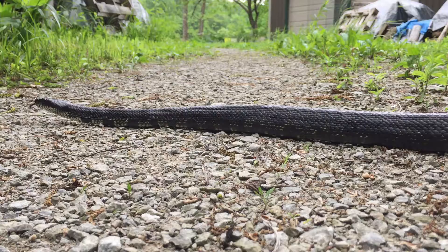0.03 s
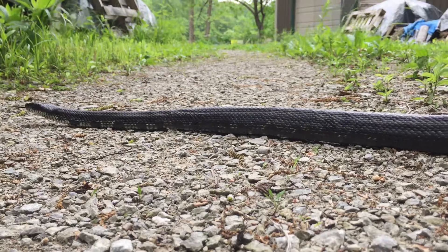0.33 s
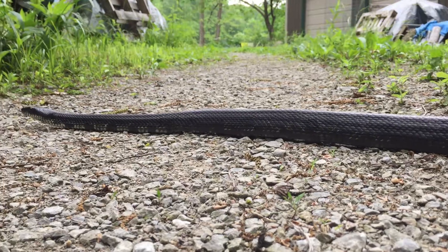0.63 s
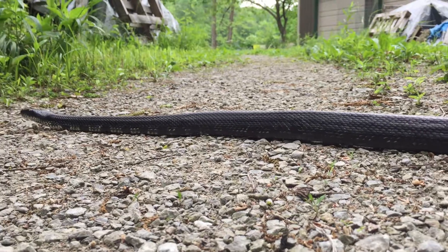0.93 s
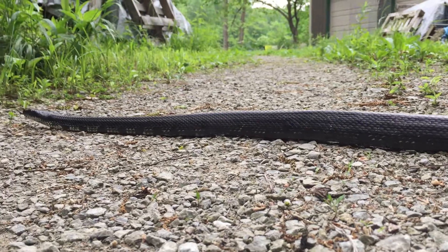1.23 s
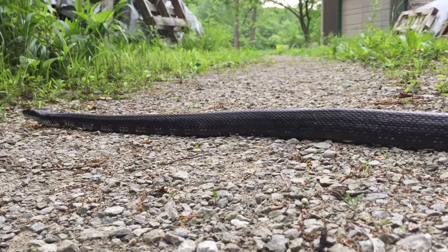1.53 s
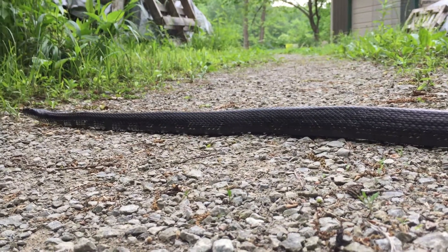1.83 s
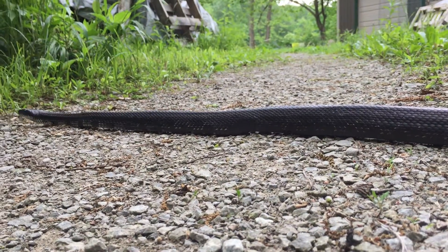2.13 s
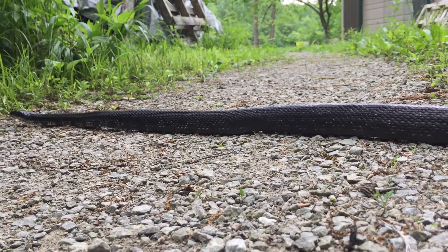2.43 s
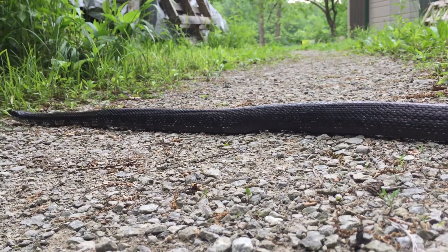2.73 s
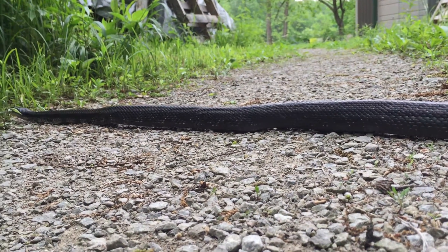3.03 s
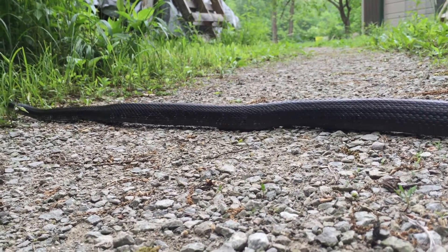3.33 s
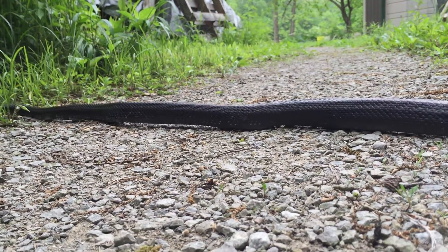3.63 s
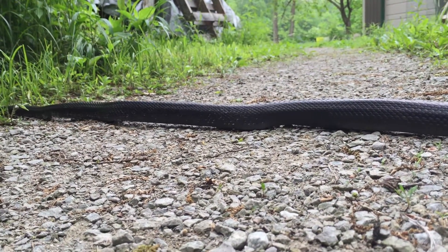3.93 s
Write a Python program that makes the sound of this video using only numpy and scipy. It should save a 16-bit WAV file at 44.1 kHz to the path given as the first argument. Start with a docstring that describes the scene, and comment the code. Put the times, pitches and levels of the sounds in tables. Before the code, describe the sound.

A low rumble of wind or distant traffic runs quietly under a faint leafy hiss, stepping up at about 2.2 seconds. Soft buffets thump the microphone throughout, and a finger bumps it dully at 0.8 seconds. Small birds chirp, whistle and warble faintly in the trees, busiest from 1 to 2.5 seconds. Gravel ticks lightly close by near 0.4, 1.4 and 3.2 seconds.

```python
"""A low, far rumble of wind or traffic, stepping up halfway, heard from a gravel path at a wood's edge.
The microphone is hand-held near the ground: soft buffets thump on it and a finger bumps its case once.
Close by, a stone ticks now and then over a faint hiss of leaves and gravel.
Small birds chirp and whistle in the trees, near and far; the trunks scatter their notes into a haze."""
import sys
import numpy as np
from scipy import signal
from scipy.fft import rfft, irfft
from scipy.io import wavfile
from scipy.ndimage import uniform_filter1d

SR = 44100
rng = np.random.default_rng(int(sys.argv[2]) if len(sys.argv) > 2 else 0)


def inscribe(sig):
    """Save sig as 16-bit PCM at rate SR to the path in sys.argv[1].

    A 1-D sig is mono; a 2-D sig holds one channel per row.
    Samples are clipped to [-1, 1] before scaling.
    """
    pcm = np.round(np.clip(np.atleast_2d(sig).T, -1, 1) * 32767)
    wavfile.write(sys.argv[1], SR, pcm.astype(np.int16))


N = 176400
T = np.arange(N) / SR

# still air around the path: f/Hz, relative density/dB
AIR_SPECTRUM = [(25, -24), (40, 0.5), (80, -3), (105, -4.5), (140, 2), (200, -4), (260, -0.5), (350, -9),
                (460, -14.5), (600, -13), (950, -14), (1300, -22.5), (1800, -20.5), (2400, -25.5)]
# hiss of leaves and gravel: f/Hz, relative density/dB
HISS_SPECTRUM = [(1700, 0), (2500, -2), (3400, -2), (4200, -5.5), (4900, -8), (5800, -7), (7800, -14),
                 (9600, -15), (10400, -21), (11500, -18), (15000, -22)]
# the hiss easing off: t/s, level/dB
HISS_LEVEL = [(.12, -64), (.45, -64), (.66, -64), (1.2, -64), (2.2, -65.5), (3.0, -66.5), (4.0, -67)]
# wind or traffic far off: f/Hz, relative density/dB
RUMBLE_SPECTRUM = [(25, -16.5), (60, 5), (130, 1), (200, -1.5), (280, -1.5), (400, -5.5), (620, -6.5),
                   (780, -13), (1000, -12.5), (1250, -13), (1520, -11), (1750, -22.5), (2900, -26.5),
                   (4500, -46)]
# the rumble stepping up: t/s, level/dB
RUMBLE_LEVEL = [(.12, -56), (2.17, -56), (2.21, -47), (2.5, -47), (2.9, -47.5), (3.3, -47), (3.7, -48.5),
                (4.0, -47.5)]
# tones droning in the rumble: f/Hz, resonator width/Hz, level against the rumble/dB
DRONES = [(138, 8.5, -13), (240.5, 5, -14.5), (397, 13, -24), (1399, 49, -26), (1915, 41, -26.5)]
# the farthest birds swelling and fading: t/s, level/dB
CHORUS_LEVEL = [(.12, -69), (.42, -75), (.6, -73), (.9, -63.5), (1.12, -72), (1.22, -65.5), (1.62, -65.5),
                (1.95, -63.5), (2.25, -66.5), (2.55, -74), (2.68, -75), (2.85, -80), (4.0, -78)]
# buffets on the microphone: centre t/s, half-width/s, thump level/dB, puff level/dB
BUFFETS = [(0.122, 0.0084, -39.5, -52), (0.18, 0.048, -41, -50), (0.265, 0.017, -38, -43.5),
           (0.298, 0.024, -36, -42.5), (0.851, 0.023, -44, -60), (0.888, 0.0096, -44.5, -49),
           (1.019, 0.017, -38.5, -58), (1.047, 0.041, -38.5, -51), (1.593, 0.0089, -40, -49.5),
           (1.783, 0.035, -46, -50), (1.814, 0.0099, -36, -48.5), (1.863, 0.026, -43.5, -59),
           (1.975, 0.03, -48.5, -73), (2.224, 0.016, -46, -40.5), (2.258, 0.021, -41, -50),
           (2.782, 0.02, -47, -47), (2.959, 0.047, -42, -57), (3.437, 0.031, -48, -59),
           (3.497, 0.018, -34.5, -63), (3.555, 0.043, -42.5, -71), (3.626, 0.013, -37.5, -50),
           (3.672, 0.088, -42.5, -53), (3.973, 0.018, -54, -70)]
# chirps in the near trees: t/s, length/s, first f/Hz, middle f/Hz, last f/Hz, relative level/dB, rasp/Hz
CHIRPS = [(.21, 0.022, 5700, 5500, 5600, -65, 87.5), (.215, .02, 6960, 7040, 7000, -71, 69),
          (.258, 0.032, 7130, 7000, 6930, -74, 70), (0.348, 0.032, 4790, 5160, 5600, -66, 200),
          (0.48, 0.047, 7200, 7050, 6960, -78, 50), (0.532, 0.067, 6950, 6850, 6700, -70, 30),
          (0.604, 0.095, 6770, 6690, 6620, -67, 25), (0.563, 0.14, 5850, 4880, 4240, -68.5, 55),
          (0.833, 0.022, 6550, 7160, 7600, -66, 40), (.865, 0.016, 5450, 5300, 5250, -69, 60),
          (0.95, 0.013, 5500, 5300, 5200, -63.5, 60), (1.083, 0.027, 6950, 6750, 6720, -68, 40),
          (1.159, 0.017, 7000, 7350, 7540, -70.5, 60), (1.183, .028, 5980, 5340, 5200, -64.5, 220),
          (1.255, 0.03, 6100, 5420, 5200, -64, 130), (1.335, 0.052, 5800, 5230, 5220, -68, 70),
          (1.995, 0.084, 6050, 6100, 5900, -69, 130), (2.06, 0.042, 5460, 5200, 5150, -67, 230),
          (2.238, .018, 6100, 6040, 5950, -76, 60), (2.313, .025, 5800, 5580, 5600, -74, 120),
          (2.511, 0.014, 5550, 5580, 5620, -67.5, 30), (3.162, 0.019, 7450, 7280, 7200, -63.5, 30),
          (3.944, 0.026, 6860, 6250, 6000, -68.5, 70), (3.973, .025, 7000, 6900, 6460, -71, 90)]
# swooping calls in the near trees: t/s, length/s, outer f/Hz, turning f/Hz, relative level/dB
SWOOPS = [(1.564, 0.08, 7140, 5140, -61), (1.784, 0.056, 6830, 5260, -64), (3.763, 0.049, 7530, 8300, -71),
          (3.776, 0.059, 7570, 6840, -73.5), (3.815, 0.047, 7300, 8000, -74)]
# stones ticking on the path: t/s, relative level/dB
TICKS = [(0.444, -45), (1.405, -52), (3.163, -50)]
# ring of the stones: f/Hz, relative level/dB, t60/s
STONE_MODES = [(790, -5, 0.031), (1500, -2.5, 0.048), (3750, -9, 0.054)]
# a finger on the microphone's case: t/s, relative level/dB
KNOCKS = [(.7718, -24.5)]
# ring of the case: f/Hz, relative level/dB, t60/s
CASE_MODES = [(76.5, -10.5, 0.13), (160, -3, 0.0275), (338, -5.5, 0.02)]
# steady whistles, mostly from a bird further off; the 2.15 s row and the last two are the warbler's notes, held
# steady: t/s, length/s, f/Hz, relative level/dB
WHISTLES = [(.79, 0.16, 3730, -61.5), (0.949, 0.093, 3760, -61), (1.182, 0.052, 3610, -68),
            (1.292, .13, 5190, -72), (1.391, 0.035, 3400, -64), (2.073, 0.053, 3660, -62),
            (2.15, 0.14, 4430, -67), (2.179, 0.13, 3450, -62), (2.29, 0.14, 3490, -64),
            (2.408, 0.11, 3435, -65.5), (3.14, 0.037, 2380, -63), (3.83, .04, 1950, -60)]
# a warbling bird deeper in the wood: t/s, length/s, first f/Hz, last f/Hz, relative level/dB
WARBLE = [(1.191, .04, 3900, 3260, -61), (1.205, .025, 4870, 4650, -72), (1.28, .035, 4790, 4370, -61),
          (1.3, 0.0336, 4150, 3550, -58), (1.347, 0.025, 4400, 4720, -65), (1.378, 0.038, 3950, 3400, -69),
          (1.455, 0.049, 3950, 3360, -61), (1.512, 0.037, 4280, 3860, -61), (1.575, 0.034, 4680, 4000, -61),
          (1.629, 0.056, 3950, 3480, -58), (1.702, 0.06, 4300, 3950, -61.5),
          (1.759, 0.051, 3920, 3570, -60.5), (1.812, .035, 4000, 3880, -64), (1.86, .035, 4150, 4510, -65),
          (1.91, .045, 3583, 3765, -56.5), (1.938, 0.048, 4350, 4040, -67), (2.417, .035, 4200, 4520, -71),
          (2.635, 0.04, 4050, 4360, -73), (2.677, 0.041, 3700, 3200, -68)]


def from_db(db):
    """Decibels to gain."""
    return 10 ** (np.asarray(db) / 20)


def unit_rms(x):
    """Scale to rms 1."""
    return x / np.sqrt(np.mean(x ** 2) + 1e-20)


def level(rows):
    """Gain over time from rows of t/s, level/dB."""
    return from_db(np.interp(T, *np.transpose(rows)))


def drift(rate_hz):
    """Smooth random wander with a spread of about 1."""
    step, settle = 40, 2000
    pole = np.exp(-2 * np.pi * rate_hz * step / SR)
    white = rng.standard_normal(N // step + settle + 2)
    slow = signal.lfilter([1], [1, -2 * pole, pole * pole], white)[settle:]
    return np.interp(np.arange(N) / step, np.arange(len(slow)), unit_rms(slow))


def add(out, start_s, sound):
    """Mix a sound in at a time."""
    i = int(np.clip(start_s * SR, 0, N - 1))
    out[i:i + len(sound)] += sound[:N - i]


def progress(length_s):
    """0 to 1 over a note."""
    return np.linspace(0, 1, max(int(length_s * SR), 2))


def noise(spectrum, flicker_db, flicker_hz):
    """Coloured noise, rms 1, falling steeply past the spectrum's ends; each octave flickers by itself."""
    hz, db = np.transpose(spectrum)
    octave = np.log2(np.maximum(np.fft.rfftfreq(N, 1 / SR), 1))
    beyond = np.maximum(octave - np.log2(hz[-1]), 0) + np.maximum(np.log2(hz[0]) - octave, 0)
    colour = from_db(np.interp(octave, np.log2(hz), db) - 36 * beyond)
    bins = rfft(rng.standard_normal(N)) * colour
    bands = [irfft(bins * np.maximum(1 - abs(octave - k), 0), N) for k in range(4, 16)]
    return unit_rms(sum(band * from_db(flicker_db * drift(flicker_hz)) for band in bands))


def air_and_leaves():
    """Still air all round the microphone, with a faint hiss of leaves and gravel."""
    air = from_db(-51.5) * noise(AIR_SPECTRUM, flicker_db=2.55, flicker_hz=13.4)
    hiss = level(HISS_LEVEL) * noise(HISS_SPECTRUM, flicker_db=1.2, flicker_hz=25)
    return air + hiss


def far_rumble():
    """Wind or traffic a long way off: low noise with narrow bands droning in it."""
    roar = noise(RUMBLE_SPECTRUM, flicker_db=.5, flicker_hz=11)
    white, drones = rng.standard_normal(N), 0
    for hz, width, db in DRONES:
        peak = signal.iirpeak(hz, hz / width, fs=SR)
        drones += from_db(db) * unit_rms(signal.lfilter(*peak, signal.lfilter(*peak, white)))
    return level(RUMBLE_LEVEL) * (roar + drones)


def sing(notes, waver_hz=107.4, flutter_db=3, fade_share=.28):
    """Near-sine notes from t/s, pitch track/Hz, level/dB, rasp/Hz; rasp is the depth of a fast waver."""
    out, waver = np.zeros(N), drift(waver_hz)
    flutter = from_db(flutter_db * drift(waver_hz))
    for start, hz, db, rasp_hz in notes:
        u = np.linspace(0, 1, len(hz))
        fade = np.sin(np.pi / 2 * np.clip(np.minimum(u, 1 - u) / fade_share, 0, 1))
        pitch = hz + rasp_hz * waver.take(int(start * SR) + np.arange(len(hz)), mode="wrap")
        tone = np.sqrt(2) * np.sin(2 * np.pi * np.cumsum(pitch) / SR)
        add(out, start, from_db(db) * fade * tone)
    return out * flutter


def random_notes(low_hz, high_hz, length_s, glide, db_per_octave, count):
    """Short slurred notes at chance times and pitches, the higher ones fainter."""
    slur, notes = glide * (2 * progress(length_s) - 1), []
    for k, (late, high, slope) in enumerate(rng.random((count, 3))):
        start = (k + late) * T[-1] / count
        hz = low_hz + high * (high_hz - low_hz)
        pitch = hz * (1 + slur * (2 * slope - 1))
        rasp_hz = 44.5 * hz / 4505  # about 1% of the pitch
        notes.append((start, pitch, db_per_octave * np.log2(hz / low_hz), rasp_hz))
    return sing(notes)


def flecks():
    """Faint, brief tones speckle the midrange of the background."""
    tones = random_notes(698.4, 2086, length_s=.05, glide=.014, db_per_octave=-5.5, count=260)
    return from_db(-63.5) * unit_rms(tones)


def wood(x, t60_s=.61):
    """Dense echoes from trunks and leaves, reaching the microphone from 3 ms on and dying away."""
    echoes = rng.standard_normal(SR) * from_db(-60 * T[:SR] / t60_s) * (T[:SR] > .003)
    return signal.fftconvolve(x, echoes / np.linalg.norm(echoes))[:N]


def far_chorus():
    """Many far birds twitter at random; only their echoes reach the path."""
    song = random_notes(3117, 4505, length_s=.0489, glide=.0824, db_per_octave=-14, count=400)
    return level(CHORUS_LEVEL) * unit_rms(wood(song))


def eddies(low_hz, high_hz, evenness=.88):
    """Lumpy swings of pressure in a band, their strength mostly levelled; rms 1."""
    band = signal.butter(2, [low_hz, high_hz], "band", fs=SR, output="sos")
    swings = signal.hilbert(signal.sosfilt(band, rng.standard_normal(N)))
    strength = uniform_filter1d(abs(swings), size=300)
    return unit_rms(swings.real / strength ** evenness)


def buffets():
    """Each buffet on the microphone is a bell-shaped swell: a deep thump with a lighter puff above it."""
    thump, puff = 0, 0
    for centre, half_width, thump_db, puff_db in BUFFETS:
        swell = np.exp(-2 * np.minimum(((T - centre) / half_width) ** 2, 20))
        thump = np.maximum(thump, from_db(thump_db) * swell)
        puff = np.maximum(puff, from_db(puff_db) * swell)
    return thump * eddies(54.6, 92.5) + puff * eddies(122, 278)


def near_birds(swoop_rasp_hz=92):
    """Chirps bend and swoops turn back in the nearest trees; foliage blurs them, the wood answers."""
    notes = []
    for start, length, first, middle, last, db, rasp_hz in CHIRPS:
        bend = np.polyfit([0, .5, 1], [first, middle, last], 2)
        notes.append((start, np.polyval(bend, progress(length)), db, rasp_hz))
    for start, length, outer, turn, db in SWOOPS:
        arc = abs(np.sin(np.pi * progress(length) ** .95)) ** 2.2  # turns just before halfway
        notes.append((start, outer + (turn - outer) * arc, db, swoop_rasp_hz))
    song = sing(notes)
    foliage = wood(song, t60_s=.083)
    return from_db(-1.5) * song + from_db(-5.5) * foliage + from_db(-9) * wood(song)


def struck(hits, modes, lowpass_hz):
    """Contacts set decaying modes ringing; their softness dulls the top."""
    t, out = T[:SR // 4], np.zeros(N)
    ring = sum((-1) ** k * from_db(db - 60 * t / t60) * np.sin(2 * np.pi * hz * t)
               for k, (hz, db, t60) in enumerate(modes))
    for start, db in hits:
        add(out, start, from_db(db) * ring)
    return signal.sosfilt(signal.butter(2, lowpass_hz, fs=SR, output="sos"), out + 1e-18)


def gravel():
    """Small stones on the path tick against each other and ring briefly."""
    return struck(TICKS, STONE_MODES, lowpass_hz=7000)


def handling():
    """A finger bumps the microphone's case: a firm, dull knock."""
    return struck(KNOCKS, CASE_MODES, lowpass_hz=600)


def whistler(rasp_hz=22):
    """Steady whistled pitches, mostly from a bird further off and a few from the warbler, half lost in their
    echoes."""
    song = sing([(start, np.full(len(progress(length)), hz), db, rasp_hz)
                 for start, length, hz, db in WHISTLES])
    return (song + from_db(-5.5) * wood(song)) / np.sqrt(2)


def warbler(rasp_hz=60):
    """Slurred notes from deeper in the wood, run together by their echoes."""
    song = sing([(start, first + (last - first) * progress(length), db, rasp_hz)
                 for start, length, first, last, db in WARBLE])
    foliage = wood(song, t60_s=.13)
    return from_db(-2.5) * song + from_db(-8.5) * foliage + from_db(-5) * wood(song)


def scene():
    """Background, close sounds and birds at one microphone near the ground."""
    background = air_and_leaves() + far_rumble() + flecks()
    close = buffets() + handling() + gravel()
    birds = near_birds() + warbler() + whistler() + far_chorus()
    return (background + close + birds)[None]


def record(dry, start_s=.12, cutoff_hz=15280):
    """The sound cuts in after a moment of silence; the highest treble is cut steeply."""
    lowpass = signal.ellip(12, .1, 70, cutoff_hz, fs=SR, output="sos")
    return signal.sosfilt(lowpass, dry * (T >= start_s) + 1e-18)


dry = scene()
out = record(dry)
inscribe(out)
```